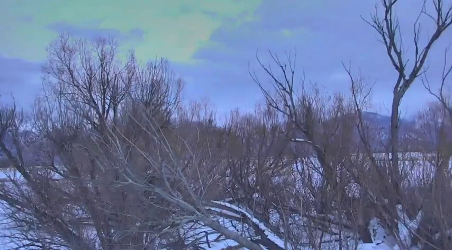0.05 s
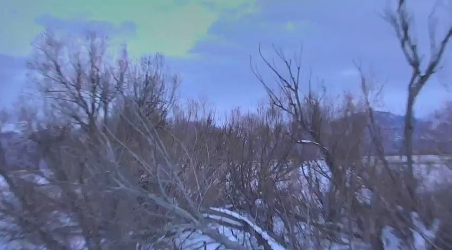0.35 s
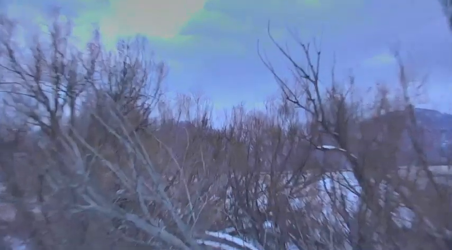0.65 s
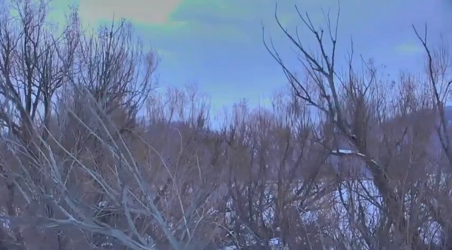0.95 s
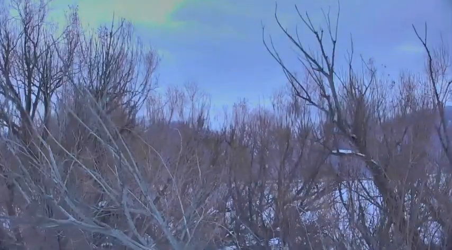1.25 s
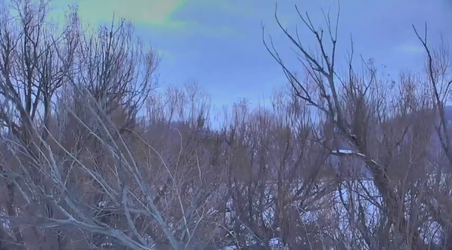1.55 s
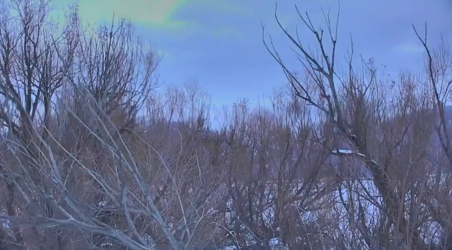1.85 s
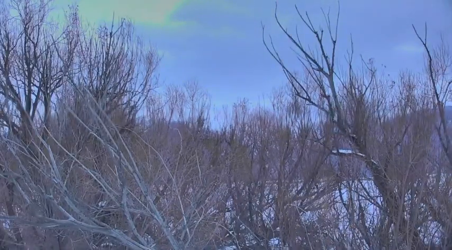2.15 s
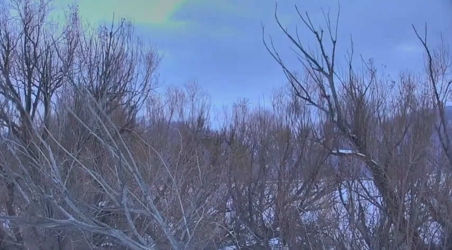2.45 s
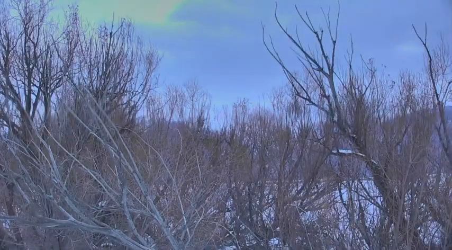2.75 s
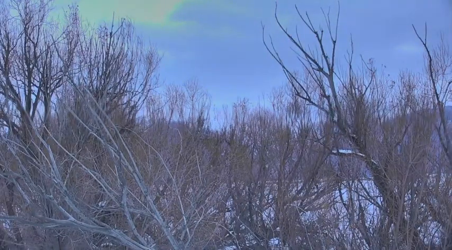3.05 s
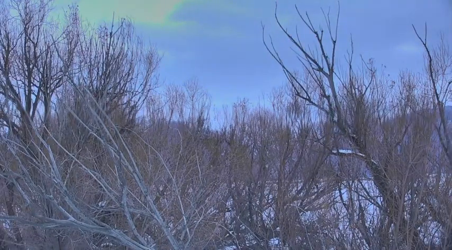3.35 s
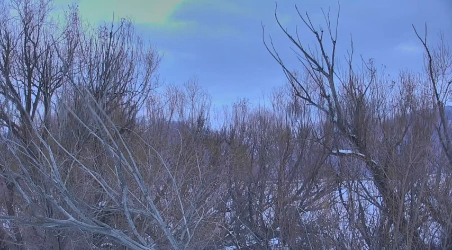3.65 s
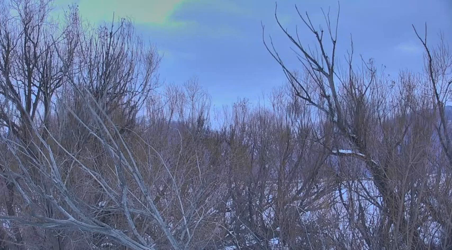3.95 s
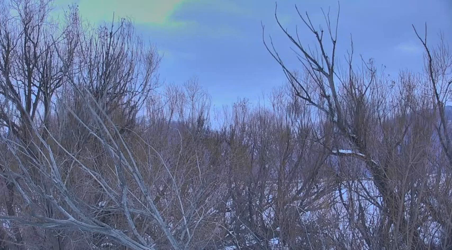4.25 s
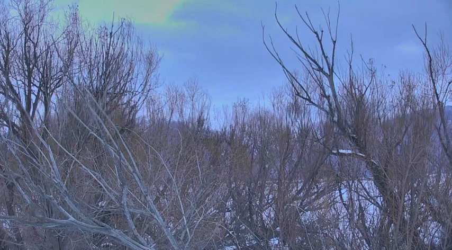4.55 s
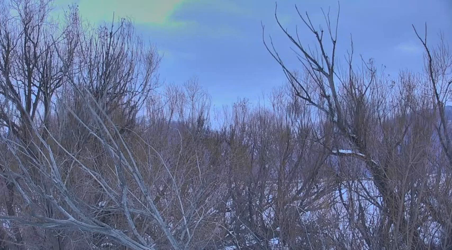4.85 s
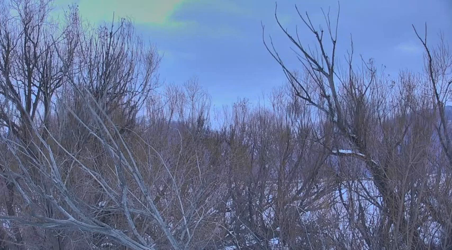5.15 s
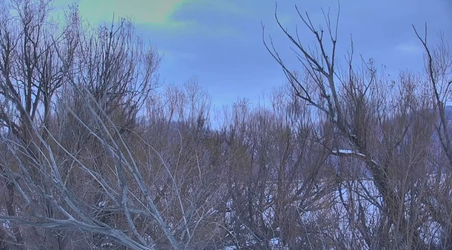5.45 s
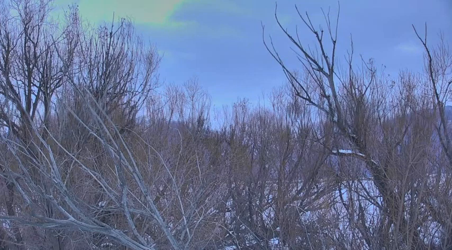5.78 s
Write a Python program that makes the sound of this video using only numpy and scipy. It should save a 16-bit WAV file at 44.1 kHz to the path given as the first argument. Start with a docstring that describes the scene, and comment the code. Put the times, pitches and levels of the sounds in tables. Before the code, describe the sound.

A great horned owl gives two soft, low hoots, one near the start and one near the end, with a short echo among the trees. Faint yelps from distant animals cluster around the first hoot, and one more rises in the middle. All the calls are half buried under the steady low roar of distant traffic and the microphone's own hiss and high, fizzing whine.

```python
"""Owl in a winter wood

Far-off traffic roars low and steady, and distant machines hum. Half buried in this are two soft hoots
of a great horned owl and a few faint yelps of other animals, scattered by the tree trunks. The nest
camera that hears it all adds hiss, a mains buzz and the fizzing whine of an unsteady power supply."""
import sys
import numpy as np
from scipy import signal
from scipy.fft import rfft, irfft, next_fast_len
from scipy.io import wavfile

SR = 44100
rng = np.random.default_rng(int(sys.argv[2]) if len(sys.argv) > 2 else 0)


def dump_mix(stems):
    """Bounce the given channels to the path in sys.argv[1] as a 16-bit WAV at rate SR."""
    frames = np.atleast_2d(stems).T  # one column per channel
    limited = np.clip(frames, -1, 1)  # hard clip at full scale
    pcm = np.round(limited * 32767).astype(np.int16)
    wavfile.write(sys.argv[1], SR, pcm)


N = 265482

# tone colour of the amplifier hiss: (frequency [Hz], relative level [dB])
HISS_COLOUR = [(20, -2), (900, -4), (1500, 0), (2100, -.5), (3100, 0.75), (4500, -.7), (7000, 1.8),
               (10000, 2.7), (15500, 1.6)]
# how alike the hiss is on the left and right: (frequency [Hz], likeness [0-1])
HISS_LIKENESS = [(50, .1), (1000, .95), (1600, 1), (4000, 1), (4600, .96), (7000, .84), (10000, .45),
                 (15000, .4)]
# strength of the mains overtones: (frequency [Hz], level [dB])
BUZZ_LEVELS = [(1400, -86), (2300, -81), (2800, -73), (3200, -74), (3600, -78), (3900, -84), (4600, -90)]
# tone colour of one spike from the power supply: (frequency [Hz], relative level [dB])
SPIKE_COLOUR = [(500, -36), (1950, -22.5), (3900, -12.5), (5900, -4.5), (7800, -1), (9800, 1), (11700, 2),
                (13700, 1.5), (15600, 0.5)]
# hum of distant machines: (pitch [Hz], relative level [dB])
MACHINE_TONES = [(110, -72.5), (121, -65), (193, -59), (256, -51.5), (300, -52.5), (321, -51)]
# tone colour of the far-off traffic: (frequency [Hz], relative level [dB])
TRAFFIC_COLOUR = [(35, -56), (60, -31), (81, -47), (107, -22.5), (144, -17), (194, -5.5), (310, -1),
                  (385, 0), (687, -17.5), (775, -19.5), (852, -24), (1070, -29), (1500, -32), (1950, -43.5),
                  (3300, -120)]
# how alike the traffic is on the left and right: (frequency [Hz], likeness [0-1])
TRAFFIC_LIKENESS = [(40, 0), (120, 1), (400, 0.99), (1200, 1)]
# distant yelps: (middle time [s], length [s], level [dB], pitch [Hz], glide [octaves],
# roughness [0-1], overtone level [dB])
ANIMAL_YELPS = [(0.157, 0.066, -47, 795, .05, 0.42, -30), (0.183, 0.087, -47, 580, 0, 0.5, -30),
                (0.364, 0.037, -42, 630, .1, .5, -30), (0.619, .06, -56.5, 835, .05, .2, -30),
                (0.722, .06, -55, 770, 0.19, 0.3, -30), (1.041, 0.056, -56, 945, 0.13, 0.16, -30),
                (3.349, 0.14, -42, 425, 0.56, 0.07, -17)]
# the owl's hoots: (middle time [s], length [s], level [dB], pitch [Hz], glide [octaves])
OWL_HOOTS = [(0.629, 0.1, -38, 305, -.15), (5.669, 0.11, -37.5, 382, 0.13)]


def amp(db):
    """Turns decibels into a number to multiply by."""
    return 10 ** (np.asarray(db) / 20)


def unit(x):
    """Scales a signal to an average strength (rms) of one."""
    return x / np.sqrt(np.mean(x ** 2) + 1e-20)


def read(points, hz):
    """Looks up a (frequency, value) table, blending between rows on a pitch scale."""
    table_hz, value = np.transpose(points)
    return np.interp(np.log(hz + 1), np.log(table_hz + 1), value)


def frequencies(size=N):
    """The frequencies [Hz] in the spectrum of a sound of this many samples."""
    return np.fft.rfftfreq(size, 1 / SR)


def wander(rate_hz):
    """A random drift of strength one, with little motion faster than rate_hz."""
    size = next_fast_len(N, True)
    slow = rfft(rng.standard_normal(size)) / np.sqrt(1 + (frequencies(size) / rate_hz) ** 4)
    return unit(irfft(slow, size)[:N])


def stereo_noise(colour, likeness):
    """Shaped noise: one part is the same on the left and right, the other is opposite."""
    same = np.clip(read(likeness, frequencies()), -1, 1)
    shared, opposite = rfft(rng.standard_normal((2, N))) * amp(read(colour, frequencies()))
    mid, side = shared * np.sqrt(1 + same), opposite * np.sqrt(1 - same)
    return unit(irfft(np.array([mid + side, mid - side]), N))


def mains_phase(mains_hz=59.98):
    """How far the mains electricity has turned through its cycles, in radians."""
    return 2 * np.pi * mains_hz * np.arange(N) / SR


def amplifier_hiss(level_db=-46):
    """The microphone's amplifier adds a steady hiss of its own."""
    return amp(level_db) * stereo_noise(HISS_COLOUR, HISS_LIKENESS)


def mains_buzz():
    """High, odd-numbered overtones of the mains leak into the microphone line."""
    multiples = np.arange(23, 77, 2)
    gains = amp(read(BUZZ_LEVELS, 60 * multiples))
    phase = mains_phase()
    tones = (gain * np.sin(k * phase + 2 * np.pi * rng.random()) for k, gain in zip(multiples, gains))
    return np.sqrt(2) * sum(tones)


def supply_whine(level_db=-40.5, flutter=0.14, flutter_hz=160, drift_db=0.75, drift_hz=16):
    """A switching power supply spikes unevenly: low overtones stay thin, high ones smear into hiss."""
    # the rate jitters, and ripple from the mains pulls it twice a cycle
    rate_hz = 1954 + 60 * wander(700) + 26 * np.sin(2 * mains_phase())
    phase = 2 * np.pi * np.cumsum(rate_hz) / SR
    spikes = np.zeros((2, N))
    for k in range(1, 9):
        tone = np.cos(k * phase) * amp(drift_db * wander(drift_hz))
        depth = flutter * (k > 2)  # only the upper tones flutter, each side on its own
        spikes += tone * (1 + depth * np.array([wander(flutter_hz), wander(flutter_hz)]))
    spectrum = rfft(spikes) * amp(read(SPIKE_COLOUR, frequencies()))
    return amp(level_db) * unit(irfft(spectrum, N))


def machine_hum(waver_hz=1.504, gain_db=-1):
    """Low machine tones whose pitch wavers on the way through the air."""
    hum = np.zeros(N)
    for hz, db in MACHINE_TONES:
        pitch_hz = hz + waver_hz * wander(2.9)
        hum += amp(db) * np.sin(2 * np.pi * np.cumsum(pitch_hz) / SR)
    return amp(gain_db) * np.sqrt(2) * hum


def traffic_roar(level_db=-37.65, swell_db=0.33, swell_hz=1.2):
    """Traffic far away: the air has taken its treble, and its level swells gently at random."""
    steady = stereo_noise(TRAFFIC_COLOUR, TRAFFIC_LIKENESS)
    return amp(level_db + swell_db * wander(swell_hz)) * steady


def among_trees(calls, fade_s=1.0, echo_db=-8):
    """Trunks scatter the calls, adding a short, blurred echo."""
    t = np.arange(SR) / SR
    tail = rng.standard_normal(SR) * amp(-60 * t / fade_s)
    echo = signal.fftconvolve(calls, tail / np.linalg.norm(tail))[:N]
    return calls + amp(echo_db) * echo


def call(middle_s, length_s, level_db, pitch_hz, glide, roughness, overtone_db):
    """A nearly pure voice that swells, glides and fades; roughness shakes its strength."""
    place = np.clip((np.arange(N) / SR - middle_s) / length_s, -.5, .5)  # -.5 at the start, .5 at the end
    phase = 2 * np.pi * np.cumsum(pitch_hz * 2 ** (glide * place)) / SR
    voice = np.sin(phase) + amp(overtone_db) * np.sin(2 * phase)
    shake = 1 - roughness + roughness * wander(57)
    swell = np.cos(np.pi * place)
    return amp(level_db) * swell * unit(voice * shake)


def distant_yelps():
    """Animals further off give short, faint calls, most of them a little rough."""
    return sum(call(*yelp) for yelp in ANIMAL_YELPS)


def owl_hoots():
    """The owl gives two smooth, low hoots: the first falls, the second rises."""
    return sum(call(*hoot, roughness=.2, overtone_db=-28) for hoot in OWL_HOOTS)


def scene():
    """The outdoor sounds, a touch stronger on the left, plus the camera's own noises."""
    background = traffic_roar() + machine_hum()
    animals = among_trees(owl_hoots() + distant_yelps())
    outdoors = (background + animals) * amp([[.3], [-.3]])
    return outdoors + supply_whine() + mains_buzz() + amplifier_hiss()


def record(dry, cutoff_hz=15770):
    """The camera sharply cuts off the very highest treble."""
    lowpass = signal.firwin(1023, cutoff_hz, window=("kaiser", 9), fs=SR)
    return signal.oaconvolve(dry, lowpass[None], "same")


dry = scene()
out = record(dry)
dump_mix(out)
```